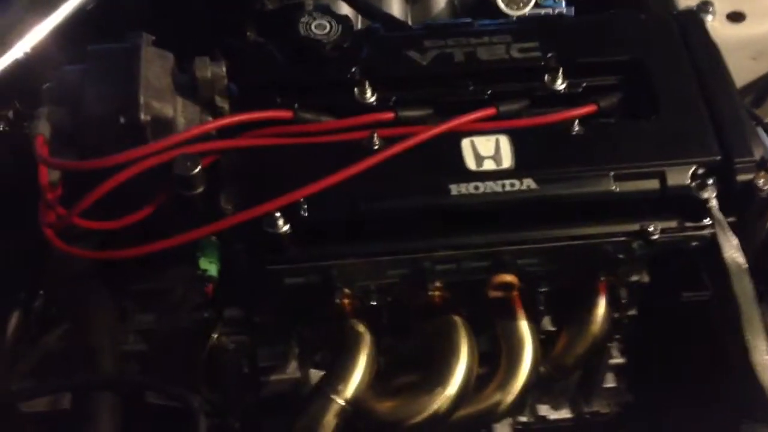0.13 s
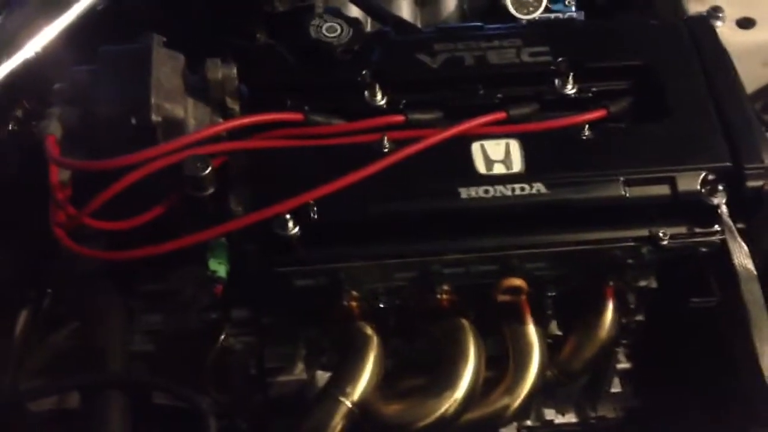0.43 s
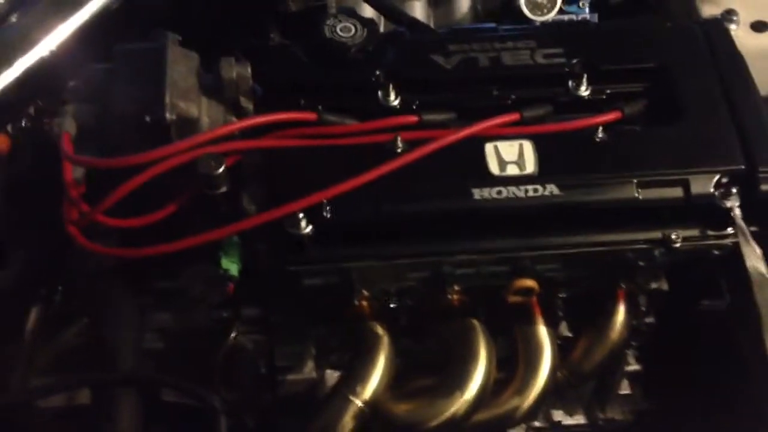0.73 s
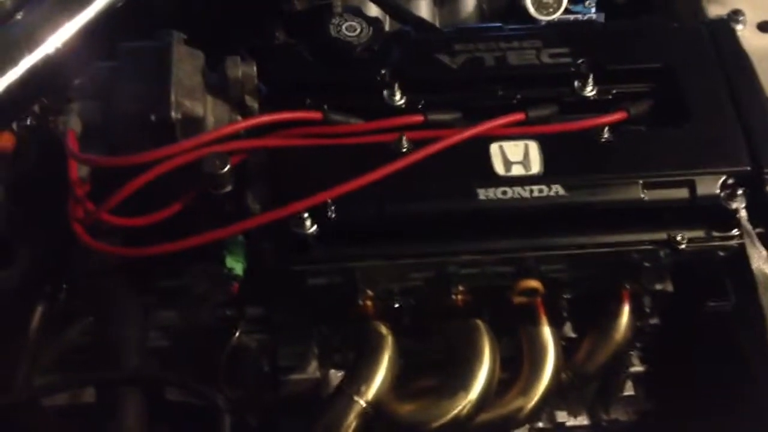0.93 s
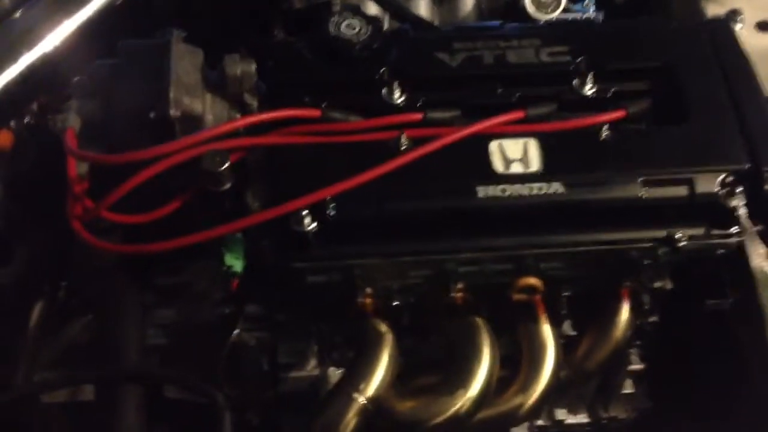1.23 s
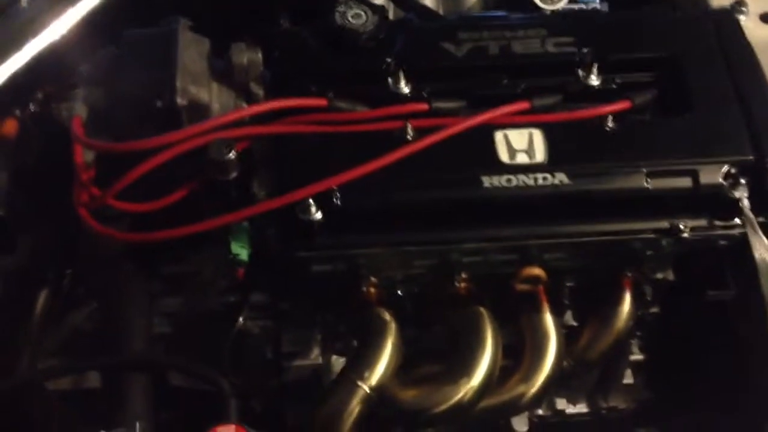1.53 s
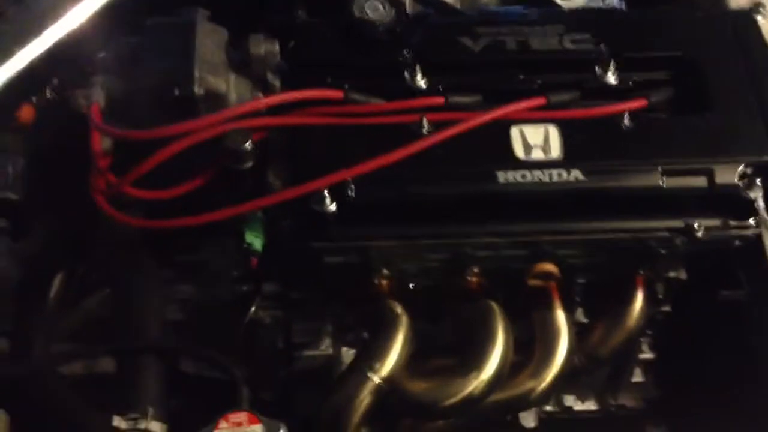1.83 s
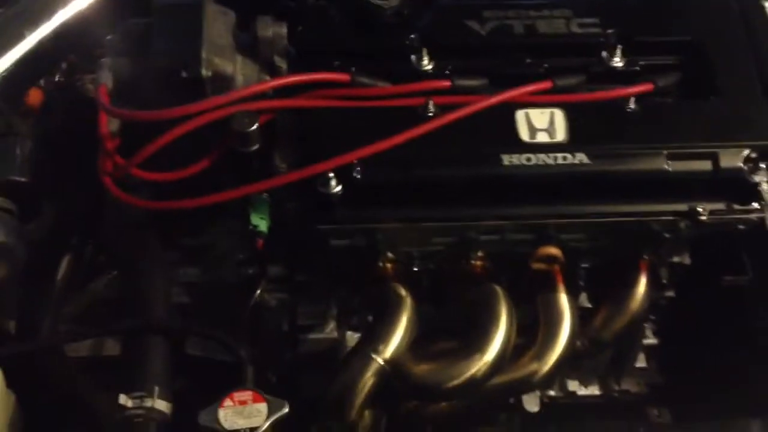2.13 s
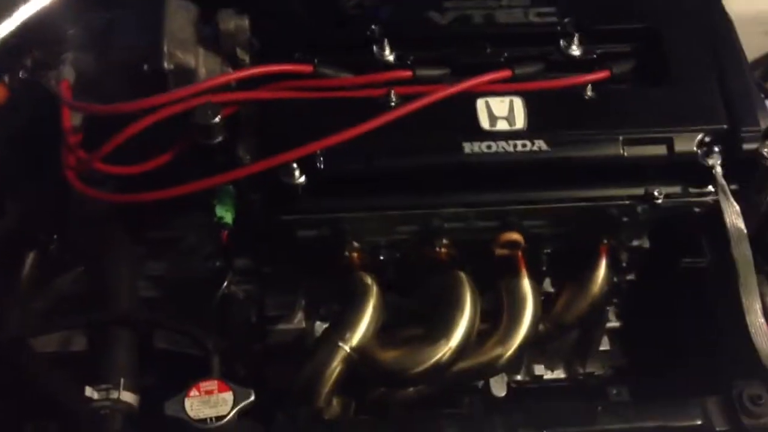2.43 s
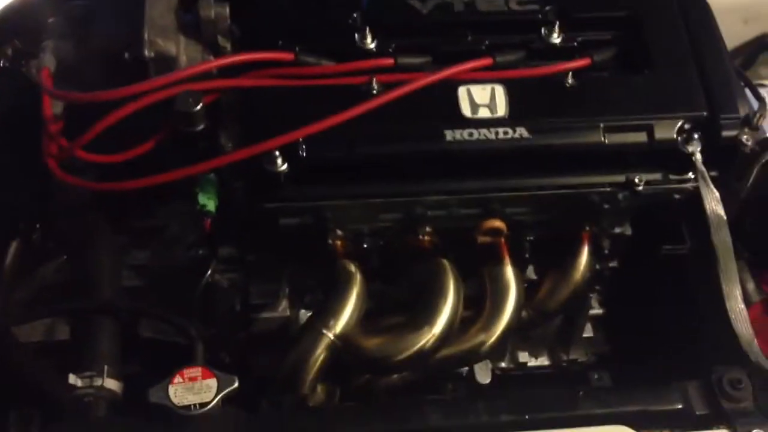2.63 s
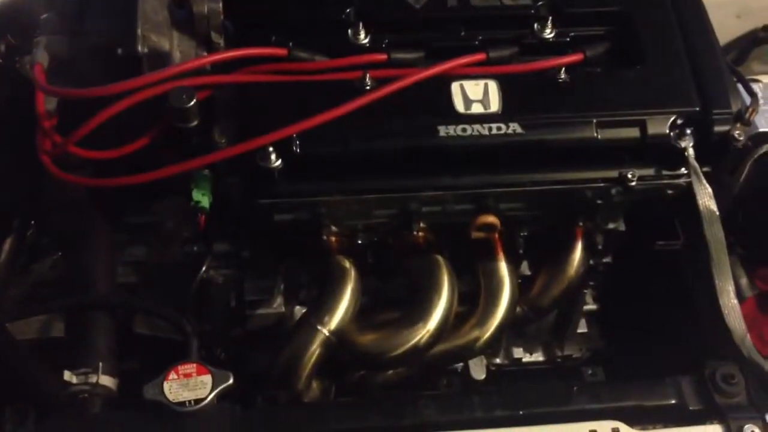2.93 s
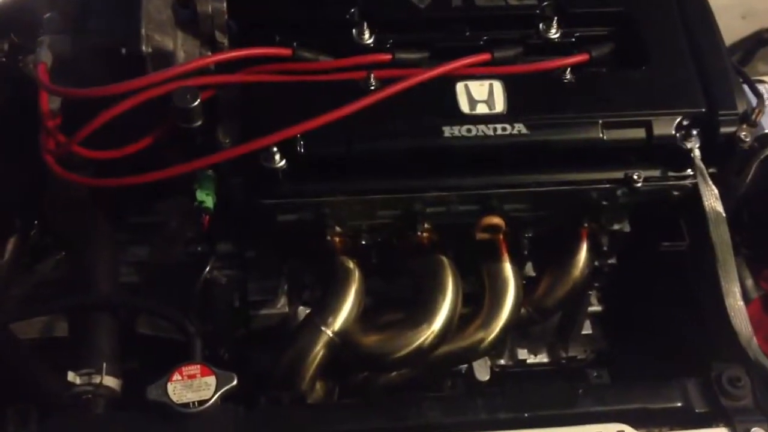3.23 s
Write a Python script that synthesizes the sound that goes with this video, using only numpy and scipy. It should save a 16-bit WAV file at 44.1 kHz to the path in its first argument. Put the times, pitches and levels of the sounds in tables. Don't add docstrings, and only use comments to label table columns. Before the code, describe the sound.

A four-cylinder car engine idles from 0 to about 3.4 seconds, already running and never revving. A low boom and droning pipe tones throb with the firings. About every 0.135 seconds a loose valve clatters dully on the metal cover, answered by a brighter tick; strengths vary. Small metallic rings, some near 0.6, 0.75 and 1.6 seconds, and steady hiss fill gaps. Close, dry, thin deep bass.

```python
import sys
import numpy as np
from scipy import signal
from scipy.fft import rfft, irfft
from scipy.io import wavfile

SR = 44100
rng = np.random.default_rng(int(sys.argv[2]) if len(sys.argv) > 2 else 0)


def volts_from_db(level):
    exponent = np.asarray(level, float) / 20
    return 10 ** exponent


def wrap_up_sound(samples):
    columns = np.atleast_2d(samples).T
    tamed = np.clip(columns, -1, 1)
    steps = np.round(tamed * 32767).astype(np.int16)
    wavfile.write(sys.argv[1], SR, steps)


N = 148617


def rms_one(x):
    return x / np.sqrt(np.mean(x ** 2) + 1e-20)


def band_pass(x, order, low_hz, high_hz):
    return signal.sosfilt(signal.butter(order, [low_hz, high_hz], "band", fs=SR, output="sos"), x)


def drift(rate_hz):
    r = np.exp(-80 * np.pi * rate_hz / SR)
    slow = signal.lfilter([1], [1, -2 * r, r * r], rng.standard_normal(N // 40 + 2002))[2000:]
    return np.interp(np.arange(N) / 40, np.arange(len(slow)), rms_one(slow))


def resonant_noise(peaks):
    out = 0
    for hz, width_hz, db in peaks:
        low_hz = max(hz - width_hz / 2, 10)
        out = out + volts_from_db(db) * rms_one(band_pass(rng.standard_normal(N), 2, low_hz, hz + width_hz / 2))
    return out


def clicks_at(s, gains):
    i = np.round(np.asarray(s) * SR).astype(int)
    inside = (i >= 0) & (i < N)
    return np.bincount(i[inside], gains[inside], N)


def ring(clicks, hz, t60_s):
    r, w = volts_from_db(-60 / (t60_s * SR)), 2 * np.pi * hz / SR
    return signal.lfilter([0, np.sin(w)], [1, -2 * r * np.cos(w), r * r], clicks + 1e-18)


def strike(modes, s, db, spread_db):
    out = 0
    for hz, level_db, t60_s in modes:
        chance = rng.standard_normal((len(s), 2))
        blow_db = db + level_db + spread_db * np.clip(chance[:, 0], -2, 1)
        out = out + ring(clicks_at(s, volts_from_db(blow_db) * np.sign(chance[:, 1])), hz, t60_s)
    return out


def puffs(s, db, low_hz, high_hz, hold_s, t60_s):
    held = np.convolve(clicks_at(s, volts_from_db(db)), np.ones(max(int(hold_s * SR), 1)))[:N]
    fall = volts_from_db(-60 / (t60_s * SR))
    dying = signal.lfilter([1], [1, -fall], clicks_at(s + hold_s, volts_from_db(db)))
    return np.maximum(held, dying) * rms_one(band_pass(rng.standard_normal(N), 4, low_hz, high_hz))


# start in s, tick in dB, boom in dB, top pipe in dB.
CAM_TURNS = [(0.0827, -36, -11, -31.5), (0.2154, -27.5, -11, -29), (0.3494, -29, -13.5, -32.5),
             (0.481, -33.5, -15, -29.5), (0.613, -27.5, -12, -34), (0.7478, -29.5, -13.5, -34),
             (0.8812, -41, -21.5, -29.5), (1.0137, -37, -14, -45), (1.1493, -29, -12.5, -31),
             (1.287, -39, -11.5, -29.5), (1.4255, -43, -16.5, -33.5), (1.561, -31, -10, -27),
             (1.6992, -34, -10, -28.5), (1.8364, -46, -13.5, -34.5), (1.9734, -30, -10, -34.5),
             (2.1094, -38, -19, -32.5), (2.2449, -39, -13.5, -36), (2.378, -42, -16, -32.5),
             (2.5122, -28.5, -12, -32), (2.6475, -31, -13.5, -29.5), (2.782, -46, -21, -28.5),
             (2.917, -37, -11, -29), (3.0523, -32, -11, -32), (3.1928, -48, -19.5, -30),
             (3.3345, -36, -8, -37)]


def turn_times(places):
    turn_s = 0.135
    s = np.array(CAM_TURNS)[:, 0]
    s = np.r_[s[0] - turn_s, s, s[-1] + turn_s]
    return s[:-1, None] + np.diff(s)[:, None] * np.asarray(places)


def turn_column(k):
    column = np.array(CAM_TURNS)[:, k]
    return np.r_[np.median(column), column][:, None]


# frequency in Hz, density in dB per Hz.
HISS_SPECTRUM = [(280, -3), (480, -5.5), (516, -1.5), (834, -7.5), (1370, -6), (1750, -6.5), (5290, -17.5),
                 (8180, -13.5), (15500, -16)]
# frequency in Hz, width in Hz, level in dB.
HISS_RESONANCES = [(1365, 115, -37.5), (1522, 37, -54), (1943, 170, -45), (6850, 310, -46.5),
                   (8380, 340, -44.5), (4820, 280, -45.5), (10820, 240, -44.5), (11670, 400, -44)]


def hiss():
    level_db, patchy_db, grain_db = -26.5, 0.8, 0.6
    out, together = 0, drift(23)
    edges_hz = 400 * 2 ** np.arange(0, 5.6, .5)
    white = rng.standard_normal((2, N))
    hz, density_db = np.transpose(HISS_SPECTRUM)
    for k, (low_hz, high_hz) in enumerate(zip(edges_hz, edges_hz[1:])):
        band = band_pass(white[k % 2], 2, low_hz, high_hz)
        db = np.interp(np.log(low_hz * high_hz) / 2, np.log(hz), density_db)
        out = out + band * volts_from_db(db + patchy_db * drift(15) + grain_db * together)
    return volts_from_db(level_db) * rms_one(out) + resonant_noise(HISS_RESONANCES)


# frequency in Hz, width in Hz, level in dB.
RUMBLE_RESONANCES = [(128, 25, -37), (190, 45, -36), (330, 70, -38), (450, 55, -44), (262, 50, -36)]


def rumble():
    return resonant_noise(RUMBLE_RESONANCES)


def pipes(modes, firing_db, spread_db, glide_per_s, rings_on=False, bend=(0, 0, 0, 0), lean_db=None):
    out, pad = np.zeros(N + 2 * SR), SR // 2
    fired = turn_times(np.arange(4) / 4).ravel()
    for k, (hz, level_db, length_s, lag_s, scatter_ms) in enumerate(modes):
        n = int(length_s * SR)
        t = np.arange(n) / SR - length_s / 2
        swell = np.hanning(n)
        chance = rng.standard_normal((len(fired), 2))
        burst_db = (firing_db + (lean_db[k] if lean_db else 0)).ravel()
        gains = volts_from_db(level_db + burst_db + spread_db * chance[:, 0])
        pitch_hz = hz * (1 + np.resize(bend, len(fired)))
        cycles = -hz * chance[:, 1] * scatter_ms / 1000
        if rings_on:
            cycles = np.cumsum(cycles + np.r_[0, np.diff(fired) * (pitch_hz[1:] + pitch_hz[:-1]) / 2])
        for s, gain, f, start_cycles in zip(fired + lag_s - length_s / 2, gains, pitch_hz, cycles):
            i = int(s * SR) + pad
            phase = f * (t + glide_per_s * t ** 2 / 2) + start_cycles
            out[i:i + n] += gain * swell * np.cos(2 * np.pi * phase)
    return out[pad:pad + N]


# frequency in Hz, level in dB, burst length in s, lag in s, timing scatter in ms.
BOOM_MODES = [(129.1, -4, 0.13, 0.0028, 0.083), (114, -17.5, 0.046, -0.0164, 0.38)]
DRONE_MODES = [(198, 0, 0.07, 0, .35), (165, -9, 0.054, 0, 1.8), (230, -13, .055, 0, 1.1)]
UPPER_MODES = [(311.7, -2.5, 0.059, 0.0015, 0.512), (341.5, -4.5, 0.058, 0.00072, 0.479),
               (365.5, -8, 0.054, 0.0018, 0.614)]
TOP_MODES = [(436.8, -5, 0.096, 0.00072, .6), (462.7, -4, 0.075, 0.00085, 0.533)]
DRONE_FIRING_DB = [(-14.0, -4.5, -14.5, -22), (-16.5, -15, -16.0, -21), (-22, -31, -20.0, -17.5),
                   (-19.5, -27, -15, -18), (-15.5, -23, -13, -10.5), (-19.5, -20.0, -16.5, -13.5),
                   (-20.0, -24, -18.5, -16.5), (-18, -25, -13, -26), (-19, -39, -20, -21.5),
                   (-35, -23.0, -22, -22), (-38, -15, -15.5, -19.0), (-17.5, -13.5, -18.5, -17),
                   (-19, -24, -17.5, -23), (-42, -19, -17.0, -19), (-17, -15.5, -20, -18.5),
                   (-33, -21, -20.0, -20), (-20.5, -16, -15, -22), (-23, -21.5, -18, -23),
                   (-14.5, -12, -17, -14.5), (-22.5, -33, -25, -16.5), (-25, -48, -19.5, -18),
                   (-18.5, -16, -18.0, -19.5), (-23, -17.5, -19, -17), (-49, -19, -16.5, -17.5),
                   (-21, -19.5, -12.5, -16), (-28, -21.0, -21.0, -21.0)]
UPPER_FIRING_DB = [(-19.0, -16, -17.5, -17.5), (-18, -18, -17.5, -26), (-33, -20, -20, -25.0),
                   (-29.0, -33, -20.5, -21.5), (-18.5, -14.5, -18.0, -22.5), (-21.0, -26, -28, -23),
                   (-34, -23, -25, -23), (-20, -18.5, -25.0, -30), (-30, -25.0, -18.5, -24.5),
                   (-26, -24, -20, -20.5), (-30, -23.0, -18.0, -17.0), (-15.5, -18, -21, -20.0),
                   (-23.5, -21, -20.5, -21.5), (-25, -21, -17.0, -16.5), (-25, -26, -19.5, -24),
                   (-21.5, -25.0, -20, -18.5), (-36, -18, -20, -21), (-24, -19.5, -19.0, -23),
                   (-20, -15.5, -18, -18.5), (-30, -23, -17, -24.5), (-29.0, -22, -20, -20.5),
                   (-19, -19, -19.5, -27), (-24, -15.5, -16.0, -19), (-24, -20, -18, -17),
                   (-26, -21, -22.0, -23.5), (-27.0, -28, -25.0, -25.0)]
# level in dB, cylinders 1-4.
BOOM_CYLINDER_DB = [-40, 1, -42, -9.5]
TOP_CYLINDER_DB = [-2.1, 0.4, 1, -1.7]
DRONE_PITCH_BEND = [0.048, .02, -.01, -0.06]
UPPER_PITCH_BEND = [-0.004, 0.011, -0.0073, 0.0067]
# level in dB, cylinders 1-4.
UPPER_LEAN_DB = [(-8, -2, 3, 1), (3, 2, -9, -1), (2, -4, -6, 4)]


def exhaust():
    boom_glide_per_s, drone_glide_per_s, upper_glide_per_s = 2.2, -1.3, 0.27
    firing_spread_db, boom_spread_db, top_spread_db = .7, .8, 3.5
    boom_db = turn_column(2) + np.array(BOOM_CYLINDER_DB)
    top_db = turn_column(3) + np.array(TOP_CYLINDER_DB)
    boom = pipes(BOOM_MODES, boom_db, boom_spread_db, boom_glide_per_s)
    drone = pipes(DRONE_MODES, np.array(DRONE_FIRING_DB), firing_spread_db, drone_glide_per_s,
                  rings_on=True, bend=DRONE_PITCH_BEND)
    upper = pipes(UPPER_MODES, np.array(UPPER_FIRING_DB), firing_spread_db, upper_glide_per_s,
                  rings_on=True, bend=UPPER_PITCH_BEND, lean_db=UPPER_LEAN_DB)
    top = pipes(TOP_MODES, top_db, top_spread_db, upper_glide_per_s, rings_on=True)
    return boom + drone + upper + top


# start in s, frequency in Hz, level in dB, t60 in s.
STRAY_PARTS = [
    (.623, 3330, -25.5, 0.16),
    (.751, 2470, -25, 0.1),
    (1.589, 1410, -21, .07),
    (2.523, 6000, -33, .05),
]


def stray_parts():
    return sum(ring(clicks_at([s], volts_from_db(np.array([db]))), hz, t60_s) for s, hz, db, t60_s in STRAY_PARTS)


# place in turn 0-1, ring in Hz, ring in dB, hiss in dB.
SMALL_CONTACTS = [
    (.06, 2413, -32.5, -52),
    (0.202, 1262, -30, -42),
    (0.292, 1518, -26, -53),
    (0.478, 3830, -50, -33.5),
    (0.581, 1900, -28.5, -60),
    (.7, 3570, -32.5, -47),
    (0.728, 2135, -36, -35.5),
    (.9, 1132, -28, -54),
    (.96, 1228, -33.5, -55),
]


def small_contacts():
    spread_db, jitter_s, ring_t60_s = 2.5, .002, 0.095
    place, hz, ring_db, hiss_db = np.transpose(SMALL_CONTACTS)
    times = turn_times(place)
    ring_s = times + jitter_s * rng.standard_normal(times.shape)
    rung = 0
    for k in range(len(place)):
        rung = rung + strike([(hz[k], ring_db[k], ring_t60_s)], ring_s[:, k], 0, spread_db)
    puff_db = hiss_db + spread_db * rng.uniform(-1.1, 1, times.shape)
    return rung + puffs(times.ravel(), puff_db.ravel(), 6000, 14400, hold_s=0.012, t60_s=0.084)


# frequency in Hz, level in dB, t60 in s.
TICK_PARTS = [(5080, -4, 0.05), (6160, -1, 0.05), (7000, -5, 0.036), (8170, -3, 0.035), (9340, -4.5, .03),
              (11500, -11, .03), (14800, -6, .03)]
# frequency in Hz, level in dB, t60 in s.
COVER_DULL = [(770, -12.5, 0.096), (940, -12, 0.12), (1150, -36, 0.015), (1317, -3.5, 0.07),
              (1440, -7, 0.046), (1530, 0, 0.036), (1900, -4, 0.041), (2043, -5, 0.069),
              (2202, -7.5, 0.024), (2200, -13, 0.073), (2705, 0.5, 0.011)]
COVER_BRIGHT = [(1260, 19, 0.013), (2180, 3, 0.027), (2850, -5, 0.053), (3080, 7, 0.078), (3400, 5, 0.09),
                (3570, 9, 0.013), (3830, 2, 0.095), (3860, 12, 0.012), (4500, -8, 0.0073), (4780, 0, 0.067),
                (5670, -4, 0.09)]


def tick():
    low_hz, high_hz, spread_db = 5450, 10640, 2.5
    cover_late_s, lag_s_per_octave = .012, .012
    s, db = np.array(CAM_TURNS)[:, :2].T
    out = puffs(s, db - 0.5, low_hz, high_hz, hold_s=0.012, t60_s=0.084)
    for mode in TICK_PARTS:
        late_s = s + lag_s_per_octave * np.log2(high_hz / min(mode[0], high_hz))
        twice_s = np.r_[late_s, late_s + cover_late_s / 2]
        out = out + strike([mode], twice_s, np.r_[db, db - 3] - 3.5, spread_db)
    out += strike(COVER_DULL, s + cover_late_s, db + 3, spread_db)
    return out + strike(COVER_BRIGHT, s + cover_late_s, db - 15, spread_db)


# start in s, level in dB, brightness in dB.
VALVE_KNOCKS = [(0.002, -18, -5), (0.137, -24.5, -10), (0.268, -19.5, -12.5), (0.404, -19, -13),
                (0.534, -17, -43), (0.664, -47.5, 13.5), (0.798, -17.5, -11.5), (0.933, -20, -13),
                (1.068, -16.5, -20), (1.204, -18, -7), (1.342, -23, -0.5), (1.48, -17, -13),
                (1.613, -22, -0.5), (1.751, -26.5, -2), (1.891, -15, -13.5), (2.028, -19, -3.5),
                (2.167, -16.5, -39), (2.299, -18.5, -9.5), (2.433, -38, -22), (2.566, -20.5, -9),
                (2.701, -17, -14), (2.837, -27.5, -11), (2.971, -25.5, 1.5), (3.107, -29, -5),
                (3.247, -21, -4)]
# delay in s, dull in dB, bright in dB.
KNOCK_RATTLE = [
    (0, 0, -8),
    (.0025, 3, -2),
    (.0065, 4, 3),
    (0.01, 4, 2),
    (0.014, 2, 1),
    (0.018, 0, -2),
    (0.023, -4, -6),
]
# delay in s, frequency in Hz, level in dB, t60 in s.
KNOCK_SNAP = [
    (.0003, 1600, 12, .011),
    (.0025, 2320, 10, .022),
    (.008, 1250, 4, .02),
    (.006, 3830, 3, .04),
    (.004, 4850, -1, .025),
]
# low in Hz, high in Hz, level in dB, hold in s, t60 in s.
KNOCK_NOISE = [
    (1120, 2560, -12.5, 0.0019, 0.39),
    (3080, 4660, -11.5, 0.0066, 0.3),
]


def valve_knock():
    s, db, bright_db = np.transpose(VALVE_KNOCKS)
    delay_s, dull_gain_db, bright_gain_db = np.transpose(KNOCK_RATTLE)
    hit_s = (s[:, None] + delay_s * rng.uniform(.85, 1.15, (len(s), len(delay_s)))).ravel()
    dull_hit_db = (db[:, None] + dull_gain_db).ravel() - 9.5
    bright_hit_db = ((db + bright_db)[:, None] + bright_gain_db).ravel() - 19.5
    out = strike(COVER_DULL, hit_s, dull_hit_db, 0) + strike(COVER_BRIGHT, hit_s, bright_hit_db, 0)
    for late_s, hz, snap_db, t60_s in KNOCK_SNAP:
        out += strike([(hz, snap_db, t60_s)], s + late_s, db + 0.99 * bright_db, 0)
    for (low_hz, high_hz, body_db, hold_s, t60_s), level_db in zip(KNOCK_NOISE, [db, db + bright_db]):
        out += puffs(s, level_db + body_db, low_hz, high_hz, hold_s, t60_s)
    return out


def scene():
    engine = hiss() + rumble() + exhaust()
    contacts = stray_parts() + small_contacts() + tick() + valve_knock()
    return (engine + contacts)[None]


def roll_off(x):
    return signal.sosfilt(signal.butter(12, 16030, fs=SR, output="sos"), x)


def record(dry):
    bass_cut_hz, noise_db = 93.4, -57
    step_hz, step_db, top_cut_hz = 8970, -6.5, 15335
    cut = signal.sosfilt(signal.butter(6, bass_cut_hz, "high", fs=SR, output="sos"), dry)
    noise = volts_from_db(noise_db) * rms_one(band_pass(rng.standard_normal(dry.shape), 2, 25, 110))
    hz = np.arange(N // 2 + 1) * SR / N
    colour = volts_from_db(step_db / (1 + np.exp((step_hz - hz) / 150))) * (hz < top_cut_hz)
    mix = irfft(rfft(cut + noise) * colour, N)
    return roll_off(mix)


dry = scene()
out = record(dry)
wrap_up_sound(out)
```